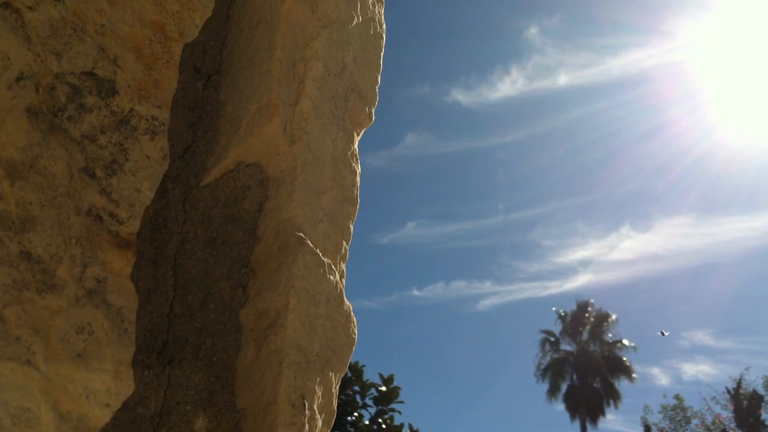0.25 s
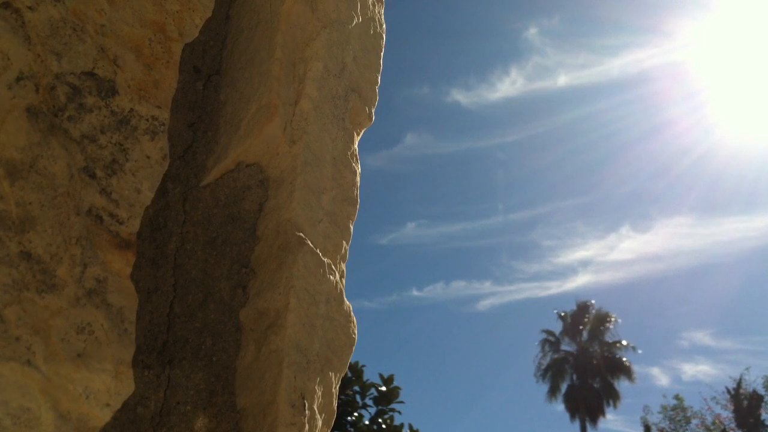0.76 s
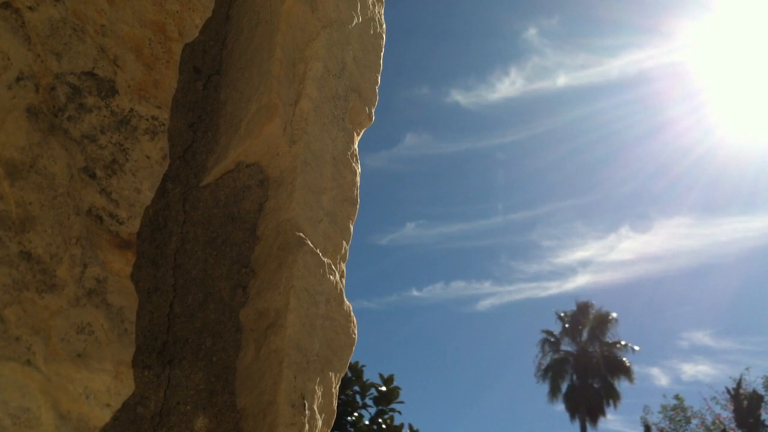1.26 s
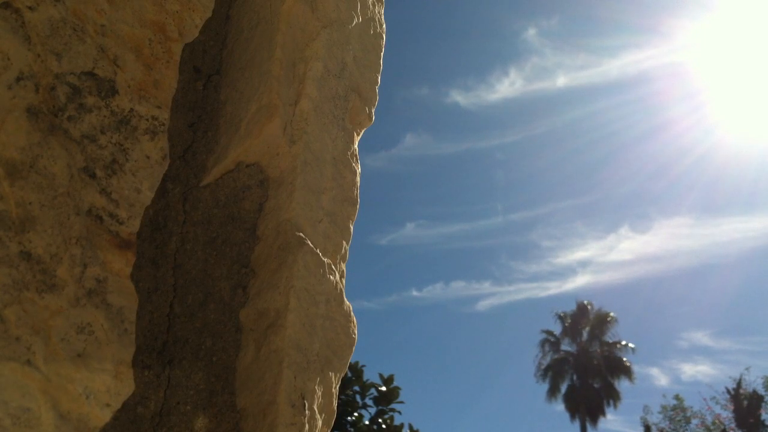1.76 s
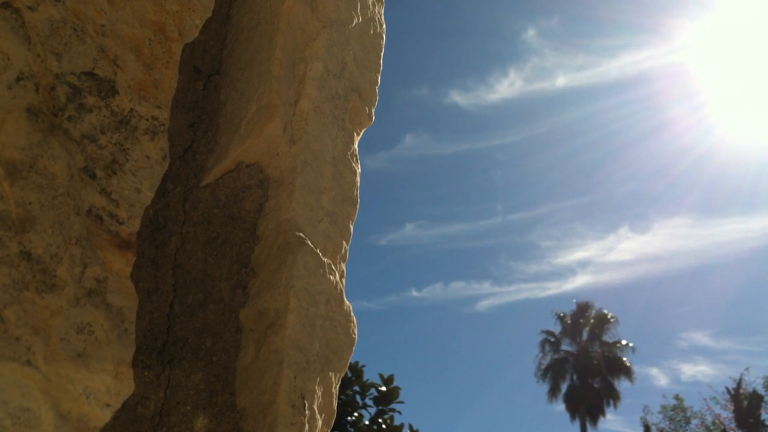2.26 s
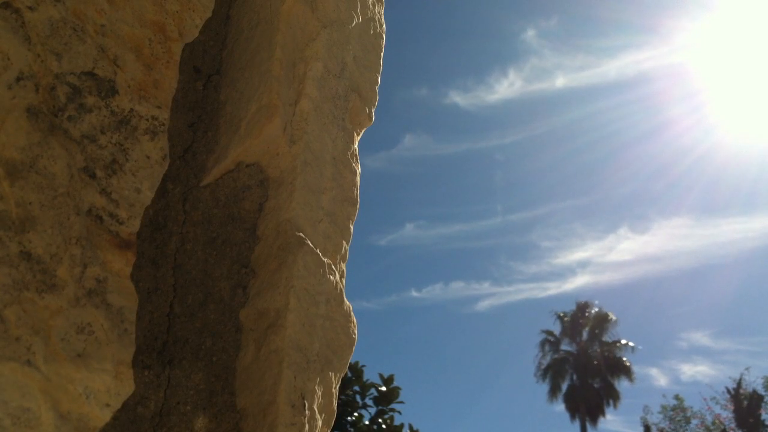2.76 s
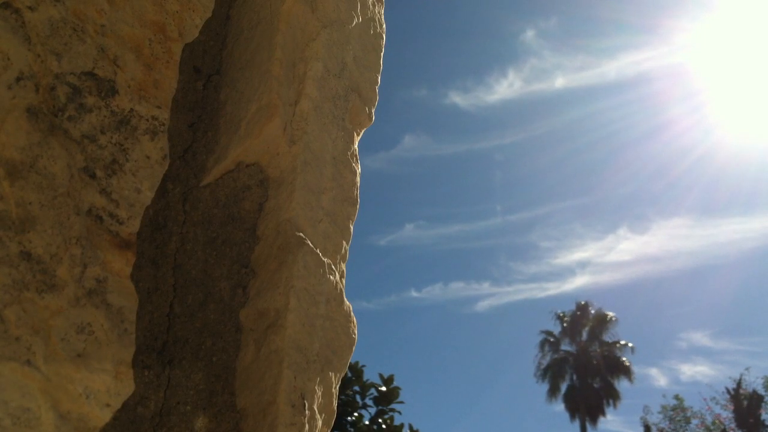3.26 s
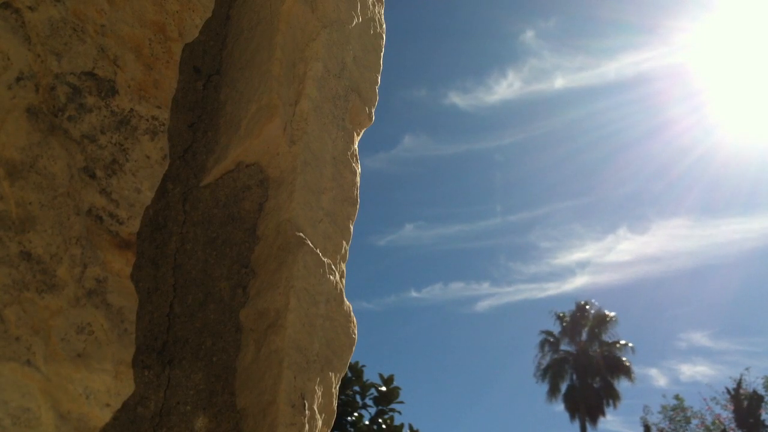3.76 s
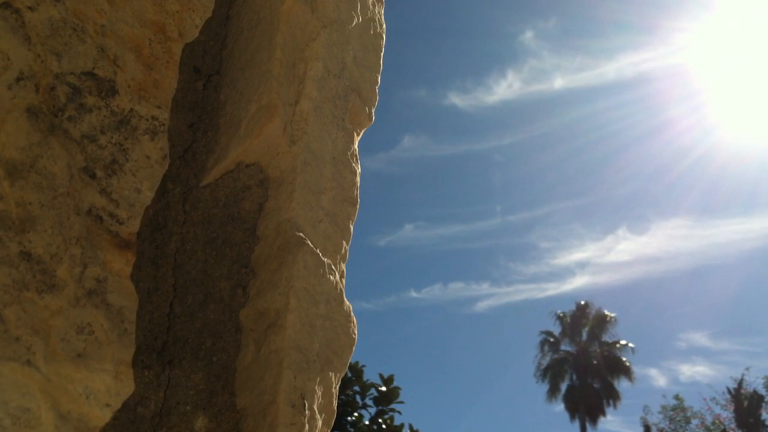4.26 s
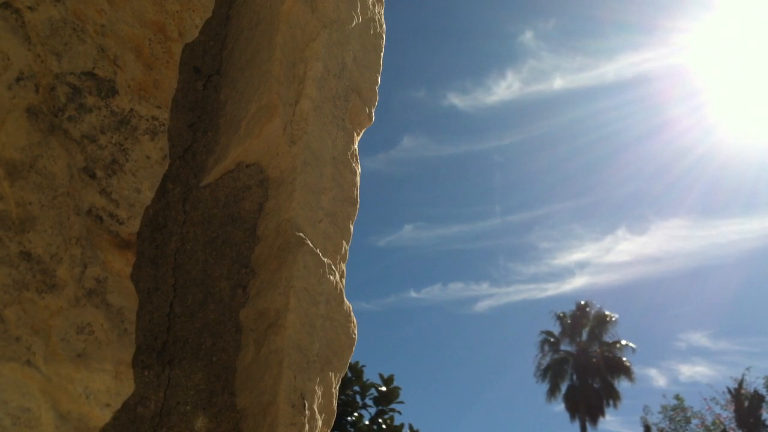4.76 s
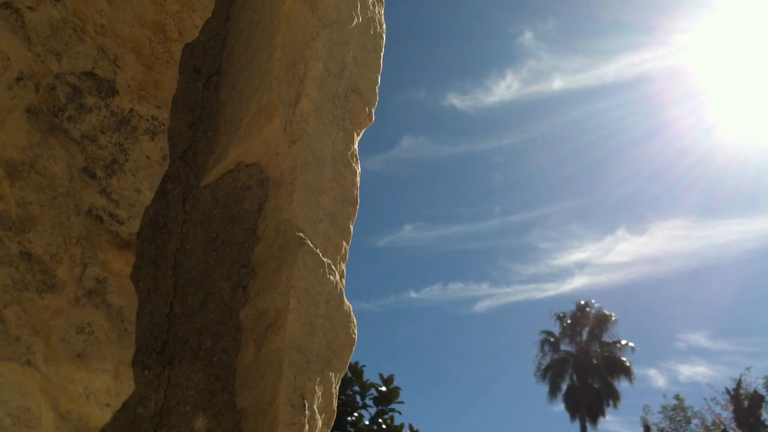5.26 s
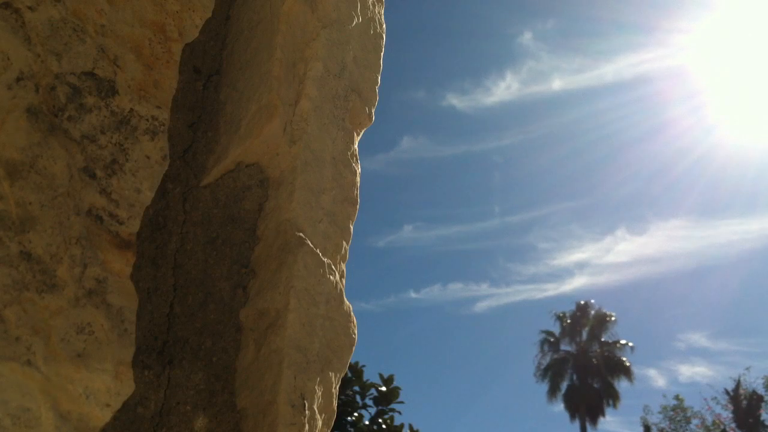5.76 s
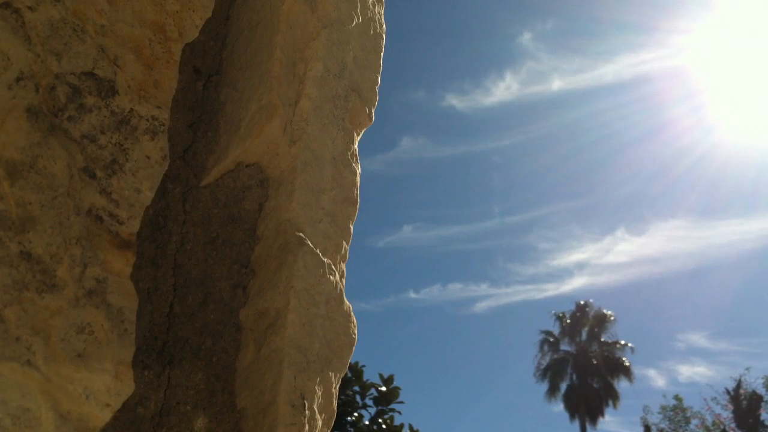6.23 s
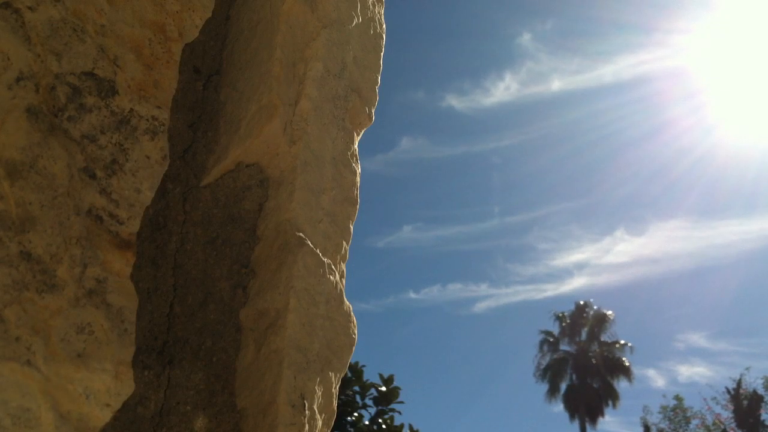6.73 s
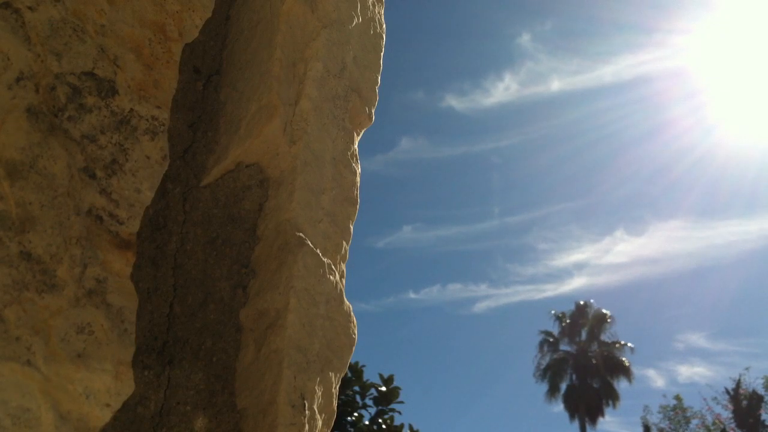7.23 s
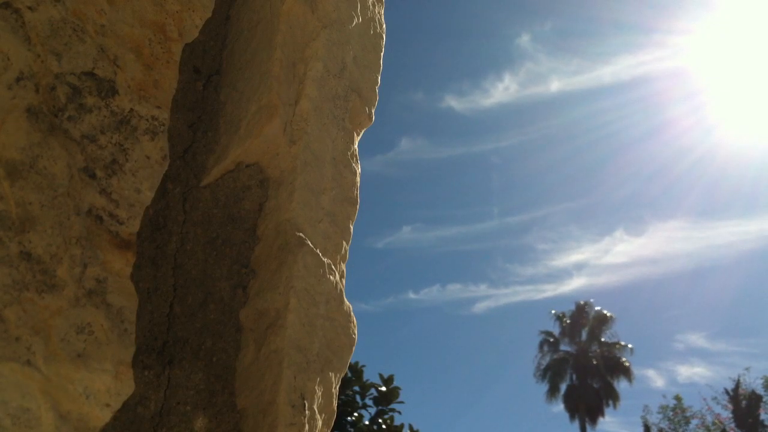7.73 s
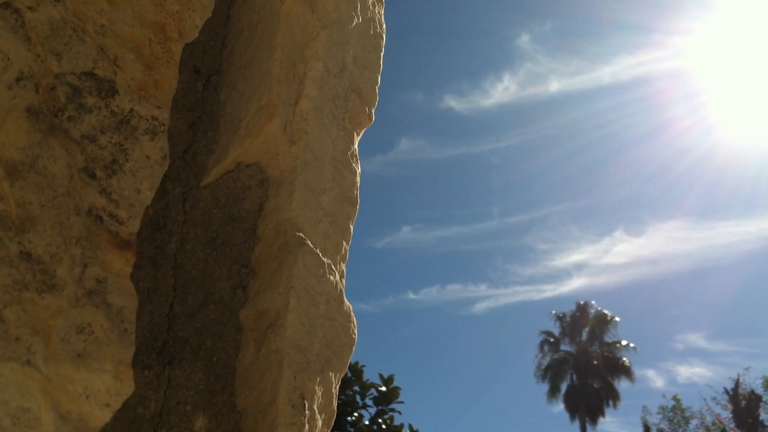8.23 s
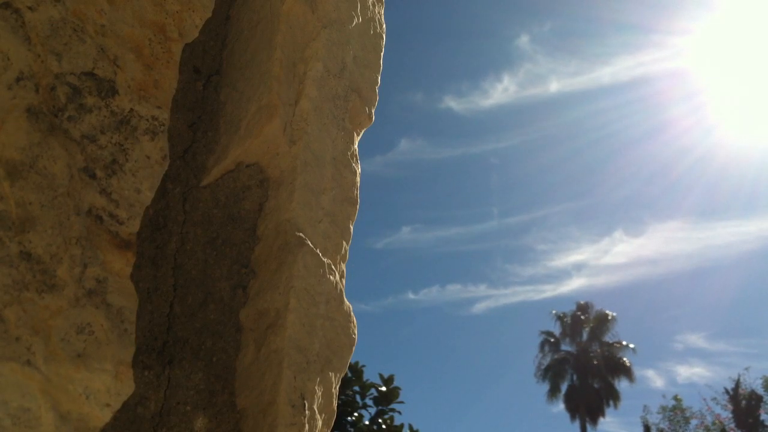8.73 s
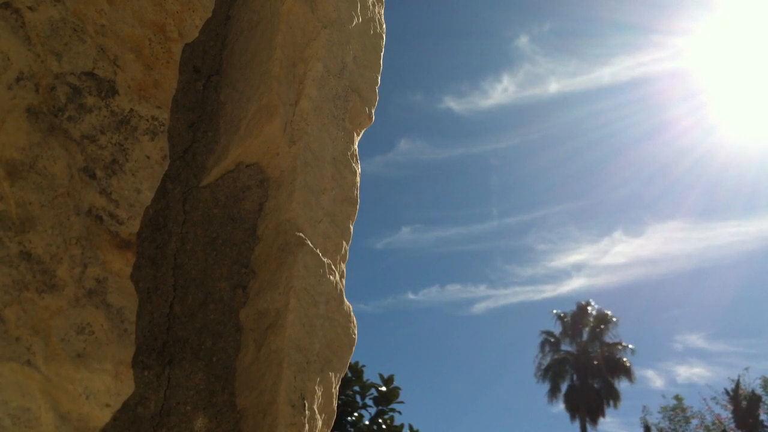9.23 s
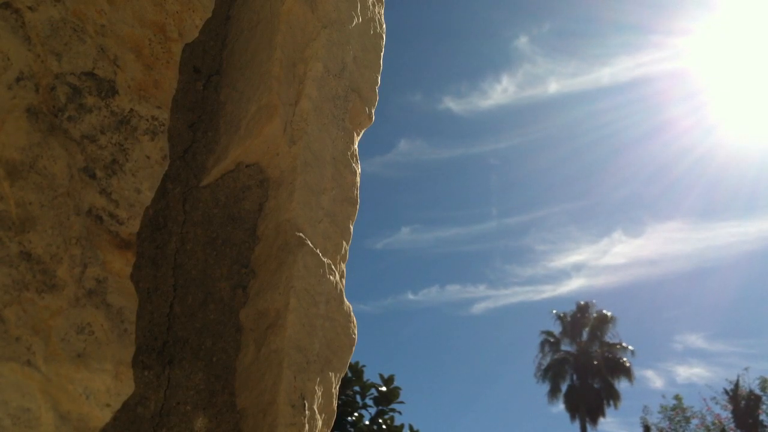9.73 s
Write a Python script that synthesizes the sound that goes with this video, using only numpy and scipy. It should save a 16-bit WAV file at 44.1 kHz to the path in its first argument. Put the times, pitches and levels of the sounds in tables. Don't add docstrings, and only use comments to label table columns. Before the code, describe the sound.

Distant road traffic rumbles and rushes steadily, with low engine drones swelling and sinking, slowly thinning, and faint bird chips at the end.

```python
import sys
import numpy as np
from scipy import signal
from scipy.fft import rfft, irfft, next_fast_len
from scipy.io import wavfile
from scipy.ndimage import uniform_filter1d

SR = 44100
rng = np.random.default_rng(int(sys.argv[2]) if len(sys.argv) > 2 else 0)


def magnitude_from_level(level_db):
    exponent = np.asarray(level_db, float) / 20
    return 10 ** exponent


def log_audio(samples):
    frames = np.atleast_2d(samples).T
    limited = np.clip(frames, -1, 1)
    pcm = np.round(limited * 32767).astype(np.int16)
    wavfile.write(sys.argv[1], SR, pcm)


N = 440559
TIME = np.arange(N) / SR
EDGE_DB = -6.5


def evened(x):
    return x / np.sqrt(np.mean(x ** 2) + 1e-20)


def add(mix, s, sound):
    part = mix[round(s * SR):][:len(sound)]
    part += sound[:len(part)]


def wander(hz):
    size = next_fast_len(N)
    f = np.fft.rfftfreq(size, 1 / SR)
    spectrum = rfft(rng.standard_normal(N), size)
    return evened(irfft(spectrum * np.exp(-(f / hz) ** 2), size)[:N])


def noise(colour, patchy_db, skirt_db, size=2048):
    hop = size // 4
    octave = np.log2(np.fft.rfftfreq(size, 1 / SR) + 1)
    frames = N // hop + (2 * size) // hop
    real, imaginary, patches = rng.standard_normal((frames, len(octave), 3)).T
    patches = uniform_filter1d(patches, size=9, axis=0)
    patches = evened(uniform_filter1d(patches, size=11, axis=1))
    f, db = np.transpose(colour)
    below = np.maximum(np.log2(f[0]) - octave, 0)
    above = np.maximum(octave - np.log2(f[-1]), 0)
    shape_db = np.interp(octave, np.log2(f), db) - skirt_db * (below + above)
    z = (real + 1j * imaginary) * magnitude_from_level(shape_db[:, None] + patchy_db * patches)
    return evened(signal.istft(z, nperseg=size, noverlap=size - hop)[1][size:N + size])


def swells(rows, still_db=-95):
    return magnitude_from_level(still_db) + sum(magnitude_from_level(db + EDGE_DB * ((TIME - s) / half) ** 2) for s, half, db in rows)


def passing_lift(rows):
    return sum(db * np.exp(-((TIME - s) / half) ** 2) for s, half, db in rows)


def engine(pitch, carried, waver, flutter_db, throb=0):
    firing_hz = np.interp(TIME, *np.transpose(pitch))
    turns = np.cumsum(firing_hz * (1 + waver * wander(hz=2.98))) / SR
    out = np.zeros(N)
    for order, rows in carried.items():
        flutter = magnitude_from_level(flutter_db * order / max(carried) * wander(hz=9.4))
        out += swells(rows) * flutter * np.cos(2 * np.pi * (order * turns + rng.random()))
    firing = np.cos(2 * np.pi * turns / 7)
    return np.sqrt(2) * out * (1 + throb * firing)


def road():
    # frequency in hertz, density in dB per hertz.
    rumble_colour = [(12, -89), (20, -63), (43, -55.5), (65, -41), (91, -28), (146, -13), (184, -9),
                     (231, -4), (269, -4), (365, -13), (420, -15.5), (550, -38), (920, -120)]
    drone_colour = [(210, -29), (350, -3), (533, -3), (627, -9), (750, -11), (980, -32.5), (1650, -120)]
    rush_colour = [(360, -34), (620, -8), (852, -0.5), (1120, -2), (1550, -5.5), (2600, -22), (3380, -49.5),
                   (5720, -120)]
    hiss_colour = [(2200, -5.5), (3000, -8), (4000, -15.5), (4800, -22.5), (5600, -31), (7000, -40),
                   (9000, -53)]
    # starting level in dB, change in dB per second, share of a passing vehicle's lift.
    rumble_law = (-35, -0.28, 0.88)
    drone_law = (-40, -0.79, 0.87)
    rush_law = (-42, -0.55, 0.43)
    hiss_law = (-58.5, -0.82, 0.81)
    # time in seconds, half length in seconds, lift in dB.
    cars = [
        (1.15, 0.93, 6),
        (2.0, 0.48, 1),
        (4.1, 0.8, 5.5),
        (5.65, 0.36, 3),
        (6.5, 0.38, 2.5),
        (8.5, .5, 4),
        (9.15, 0.59, 5),
        (9.95, 0.24, 4.5),
    ]
    # time in seconds, half length in seconds, lift in dB.
    lorries = [(1.0, 0.23, 3.5), (1.66, 0.56, 3), (2.635, 0.51, 2.5), (3.65, 0.6, 2.5), (4.394, 0.39, 4),
               (5.593, 0.7, 2.5), (6.85, .2, 1), (7.556, 0.23, 0), (8.9, 0.22, 2.5), (9.57, .2, 0)]
    # time in seconds, half length in seconds, lift in dB.
    vans = [(0, 0.23, 1), (1.652, 0.21, 3), (2.75, 0.75, 4), (3.596, 0.68, 5), (4.25, .2, -1),
            (4.6, 0.34, 1.5), (5.6, 0.33, 2), (6.954, 0.096, 3.5), (7.7, 0.47, 1), (9.598, 0.3, 1.5)]
    cars_db = passing_lift(cars)
    layers = [(rumble_law, passing_lift(lorries), noise(rumble_colour, patchy_db=.3, skirt_db=25.5, size=4096)),
              (drone_law, passing_lift(vans), noise(drone_colour, patchy_db=1.0, skirt_db=30.0)),
              (rush_law, cars_db, noise(rush_colour, patchy_db=0.5, skirt_db=23.5)),
              (hiss_law, cars_db, noise(hiss_colour, patchy_db=1.0, skirt_db=30.5, size=1024))]
    out = np.zeros(N)
    for (db, thin_db, share), lift_db, band in layers:
        out += magnitude_from_level(db + thin_db * TIME + share * lift_db) * band
    return out


def town_murmur():
    # frequency in hertz, density in dB per hertz.
    murmur_colour = [(20, -23.5), (45, -25.5), (70, -23.5), (100, -6), (130, 3.5)]
    # time in seconds, half length in seconds, level in dB.
    murmur_swells = [
        (0, 1.5, -59.5),
        (9.5, 0.33, -58),
    ]
    return swells(murmur_swells, still_db=-62.5) * noise(murmur_colour, patchy_db=2.0, skirt_db=30.5, size=4096)


def truck():
    # time in seconds, frequency in hertz.
    truck_pitch = [(0, 46.77), (2.0, 45.7), (3.3, 44.87), (5.4, 42.27), (5.62, 41.06), (7.3, 39.85),
                   (8.0, 38.83), (9.0, 37.4), (10, 36.5)]
    # time in seconds, half length in seconds, level in dB.
    second = [(.9, .8, -64.5), (1.5, 0.15, -58), (3.8, 0.66, -60.5), (5.58, 0.19, -51), (5.85, .2, -54),
              (6.12, .14, -54.5), (6.9, .3, -60)]
    third = [(.75, .15, -47), (2.5, 0.86, -53.5), (3.7, .12, -55), (4.7, .4, -51.5), (5.3, 0.36, -52.5),
             (5.75, 0.18, -56), (6.1, .2, -50), (6.45, .22, -45), (7.0, 0.32, -59), (7.75, .15, -58)]
    fourth = [(.03, 0.071, -37), (.55, 0.15, -43.5), (6.66, 0.079, -40.5), (.3, 0.15, -32),
              (.76, 0.075, -29.5), (1.3, 0.3, -42.5), (1.95, 0.14, -39.5), (2.2, 0.15, -38.5),
              (3.25, 0.14, -44.5), (4.03, 0.17, -36), (3.82, 0.11, -44), (4.25, .15, -44.5),
              (5.3, 0.17, -38.5), (5.84, 0.18, -37), (6.25, 0.28, -45), (6.75, 0.18, -45.5), (7.2, .2, -50),
              (9.4, 0.34, -55.5)]
    fifth = [(1.2, 0.33, -41), (2.6, 0.083, -44.5), (5.2, .15, -50), (5.6, 0.2, -36.5), (6.05, .12, -47),
             (6.4, 0.25, -41.5), (6.9, 0.17, -48)]
    sixth = [(.9, .3, -52.5), (2.6, 0.28, -44), (4.3, 0.32, -43), (5.3, 0.13, -43.5), (5.9, 0.17, -36.5),
             (6.3, 0.096, -37), (8.15, 0.31, -41.5)]
    seventh = [(2.4, 0.22, -48.5), (4.2, 0.25, -45), (5.33, 0.16, -36.5), (5.7, 0.12, -36.5),
               (6.1, 0.15, -42), (6.52, 0.095, -35.5), (6.9, .15, -51)]
    carried = {2: second, 3: third, 4: fourth, 5: fifth, 6: sixth, 7: seventh}
    return engine(truck_pitch, carried, waver=0.0042, flutter_db=2.8)


def recorder_hiss():
    # frequency in hertz, density in dB per hertz.
    input_colour = [(5000, -4), (6500, -3), (8000, -5.5), (9500, -10), (11000, -13.5), (13000, -14.5),
                    (15700, -21.5)]
    level_db = -78.5 - 0.09 * TIME
    return magnitude_from_level(level_db) * noise(input_colour, patchy_db=-1.5, skirt_db=9.5, size=1024)


def leaves():
    # frequency in hertz, density in dB per hertz.
    rustle_colour = [(4200, -5), (5000, 3), (6500, -4), (8000, -8.5), (10000, -16.5)]
    # time in seconds, half length in seconds, level in dB.
    gusts = [
        (.6, .7, -77.5),
        (1.85, 0.67, -78.5),
        (4.2, 1.6, -80.5),
        (9.8, 0.44, -82),
    ]
    return swells(gusts, still_db=-93.5) * noise(rustle_colour, patchy_db=1.0, skirt_db=20.0, size=512)


def idler():
    # time in seconds, frequency in hertz.
    idler_pitch = [(0, 32.14), (10, 31.93)]
    # time in seconds, half length in seconds, level in dB.
    second = [(2.5, .6, -70), (3.9, 0.72, -66.5)]
    third = [(0.4, 0.39, -57), (1.8, .5, -56.5), (2.8, .5, -58), (3.9, 0.51, -59), (4.5, .2, -57.5)]
    fourth = [(.6, 0.33, -49.5), (1.6, .4, -51), (2.5, 0.51, -52.5), (3.5, 0.41, -48), (4.7, 0.28, -55),
              (5.2, 0.3, -56)]
    sixth = [(3.35, 0.11, -42), (4.85, 0.33, -48)]
    return engine(idler_pitch, {2: second, 3: third, 4: fourth, 6: sixth}, waver=0.004, flutter_db=2.0)


def beacon():
    # frequency in hertz, level in dB, t60 in seconds.
    input_ring = [
        (5900, 0.0012, .0025),
        (8700, 3, .0018),
    ]
    first_s, every_s, peak_db = .0852, .1024, -66.5
    t, out = np.arange(200) / SR, np.zeros(N)
    ring = sum(magnitude_from_level(db - 60 * t / t60) * np.sin(2 * np.pi * hz * t) for hz, db, t60 in input_ring)
    for s in np.arange(first_s, N / SR, every_s):
        add(out, s, magnitude_from_level(peak_db + rng.standard_normal()) * ring)
    return out


def swishes(size=1024):
    # time in seconds, frequency in hertz, width in octaves, half length in seconds, level in dB.
    tyre_swishes = [(.36, 3450, .05, .1, -68), (.6, 3000, .25, .3, -68), (.75, 1620, .15, 0.33, -51.5),
                    (1.302, 1620, .15, .2, -50), (1.1, 3200, .2, .35, -70.5), (2.0, 4500, .08, .2, -77),
                    (3.7, 540, .1, .15, -51), (3.9, 1430, 0.2, .25, -57), (4.65, 900, .15, .12, -50),
                    (5.45, 844, .08, 0.089, -48), (5.8, 705, .2, 0.22, -54), (6.3, 1400, .25, 0.26, -52.5),
                    (8.949, 1290, .2, .15, -59), (9.3, 1090, .15, .12, -55), (9.1, 2700, .2, 0.33, -62)]
    f, t, z = signal.stft(rng.standard_normal(N), SR, nperseg=size)
    octave = np.log2(f + 1)[:, None]
    gain = 0
    for s, hz, wide, half, db in tyre_swishes:
        in_time = magnitude_from_level(db + EDGE_DB * ((t - s) / half) ** 2)
        in_pitch = np.exp(-((octave - np.log2(hz)) / wide) ** 2)
        gain = gain + in_time * in_pitch * np.sqrt(SR / (2 * hz * wide))
    return signal.istft(z * gain, SR, nperseg=size)[1][:N]


def strays():
    # time in seconds, frequency in hertz, glide in hertz per second, half length in seconds, level in dB.
    stray_notes = [(0.951, 285, 30, 0.096, -43), (1.552, 281, -0.5, 0.13, -43.5),
                   (1.7, 446, 0.5, 0.13, -40.5), (1.776, 251, 0, 0.083, -38.5),
                   (2.053, 268.7, 0.5, .15, -40), (2.552, 315, -21.5, 0.12, -41),
                   (2.649, 271.2, 0, 0.2, -43), (3.1, 240, 30.5, 0.16, -37.5), (3.352, 261, 0, 0.11, -43.5),
                   (3.602, 234.4, 1.5, 0.097, -37), (4.247, 773, -19.5, .12, -47),
                   (4.6, 263, -11, 0.26, -42), (4.972, 848, -30, .05, -52), (5.099, 232, 1, 0.099, -45),
                   (1.47, 213.2, -0.5, 0.097, -38.5), (2.277, 320, 1, 0.078, -40.5),
                   (3.3, 196, -1, 0.069, -36), (4.248, 308, -21, .13, -40), (3.447, 281, 0, 0.084, -42),
                   (6.25, 238, 4, .08, -39), (6.551, 206, -1.5, .08, -40.5), (6.851, 273.6, 1, .1, -43.5),
                   (8.0, 232, 0, .08, -38.5), (8.38, 238, -0.5, .07, -42), (8.74, 229, -30, .08, -37),
                   (7.217, 373, 2.5, 0.093, -45.5), (7.747, 258.4, 19.5, 0.14, -45),
                   (8.05, 212.5, 10.5, .15, -47), (8.498, 254.3, 0.5, 0.18, -47),
                   (9.149, 240.7, 0, 0.18, -47), (9.548, 313, 11.5, 0.28, -49), (9.82, 256, -2, 0.079, -47)]
    waver_share, flutter_db = .006, 2.2
    waver, flutter, out = wander(hz=6.0), wander(hz=9.0), np.zeros(N)
    shifts = rng.integers(0, N, len(stray_notes))
    for (s, hz, glide, half, db), shift in zip(stray_notes, shifts):
        near = np.flatnonzero(abs(TIME - s) < 4 * half)
        t = TIME[near] - s
        own = (near + shift) % N
        turns = np.cumsum((hz + glide * t) * (1 + waver_share * waver[own])) / SR
        level = magnitude_from_level(db + EDGE_DB * (t / half) ** 2 + flutter_db * flutter[own])
        out[near] += level * np.cos(2 * np.pi * turns)
    return np.sqrt(2) * out


def whine():
    # frequency in hertz, density in dB per hertz.
    rib_colour = [(4300, -9), (4550, 1.5), (4800, -8.5)]
    # time in seconds, half length in seconds, level in dB.
    rib_swells = [
        (2.1, 0.78, -74.5),
        (4.75, 0.91, -79),
    ]
    return swells(rib_swells, still_db=-92.5) * noise(rib_colour, patchy_db=-1.0, skirt_db=60.5, size=1024)


def tread():
    # frequency in hertz, density in dB per hertz.
    hum_colour = [(640, -6.5), (780, 0), (900, 1), (1080, -5.5)]
    # time in seconds, half length in seconds, level in dB.
    hum_swells = [(1.6, 0.26, -48.5), (2.5, .5, -44.5), (3.3, .3, -56), (4.25, 0.39, -46),
                  (4.8, 0.21, -49.5), (5.45, .25, -47), (6.6, .4, -53.5), (8.1, 0.26, -57)]
    return swells(hum_swells, still_db=-57.5) * noise(hum_colour, patchy_db=0.5, skirt_db=28.0)


def early_boom():
    # time in seconds, frequency in hertz.
    pipe_pitch = [(2.4, 280.9), (3.6, 279), (4.6, 284)]
    # time in seconds, half length in seconds, level in dB.
    pipe_swells = [
        (2.7, 0.091, -44.5),
        (3.1, 0.12, -37),
        (3.62, 0.09, -32),
        (3.8, 0.12, -38),
        (4.03, 0.098, -25.5),
    ]
    return engine(pipe_pitch, {1: pipe_swells}, waver=.004, flutter_db=1.3, throb=.5)


def late_boom():
    # time in seconds, frequency in hertz.
    pipe_pitch = [(7, 228), (7.5, 233), (8.0, 231), (8.4, 236), (8.6, 214), (9.0, 210), (9.35, 211),
                  (9.55, 206), (10, 219)]
    # time in seconds, half length in seconds, level in dB.
    pipe_swells = [(7.35, 0.18, -41), (8.0, .12, -40.5), (8.3, 0.16, -39.5), (8.78, 0.13, -36.5),
                   (9.0, 0.11, -36.5), (9.3, 0.1, -34), (9.62, 0.08, -47), (9.85, 0.13, -43.5)]
    return engine(pipe_pitch, {1: pipe_swells}, waver=0.008, flutter_db=2.0)


def birds():
    # time in seconds, frequency in hertz, glide in hertz, length in seconds, level in dB.
    bird_chips = [
        (7.617, 7100, 500, .02, -81),
        (7.7, 7200, -300, .045, -82),
        (9.33, 5900, -48, .035, -71),
        (9.538, 6500, 0, .03, -80),
        (9.617, 7950, -200, .022, -74.5),
        (9.732, 6600, 5, .015, -80),
        (9.875, 6700, 0, .035, -80),
        (9.965, 7500, -3, 0.02, -79),
    ]
    out = np.zeros(N)
    for s, hz, glide_hz, length, db in bird_chips:
        u = np.linspace(0, 1, round(length * SR))
        roughness = evened(uniform_filter1d(rng.standard_normal(4000), size=40))[:len(u)]
        whistle = np.sin(2 * np.pi * np.cumsum(hz + glide_hz * u) / SR)
        add(out, s, magnitude_from_level(db) * np.hanning(len(u)) * (1 + .3 * roughness) * whistle)
    tail_t60_s, tail_db = .08, -10
    scatter = rng.standard_normal(6000) * magnitude_from_level(-60 * TIME[:6000] / tail_t60_s)
    return out + magnitude_from_level(tail_db) * signal.oaconvolve(out, scatter / np.linalg.norm(scatter))[:N]


def scene():
    traffic = road() + town_murmur() + swishes() + strays() + whine() + tread()
    engines = truck() + idler() + early_boom() + late_boom()
    return (traffic + engines + leaves() + birds())[None]


def roll_off(x):
    return signal.sosfilt(signal.butter(12, 15720, fs=SR, output="sos"), x)


def record(dry):
    return roll_off(dry + recorder_hiss() + beacon())


dry = scene()
out = record(dry)
log_audio(out)
```